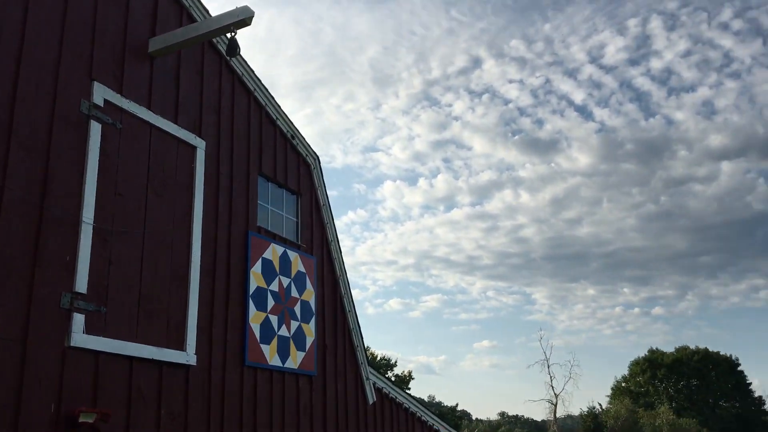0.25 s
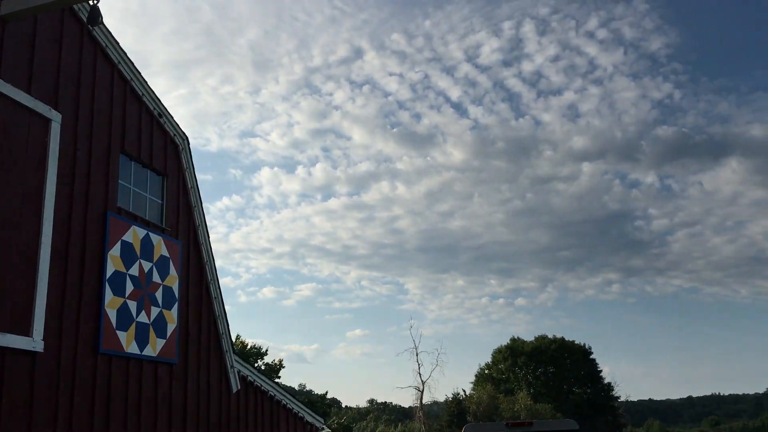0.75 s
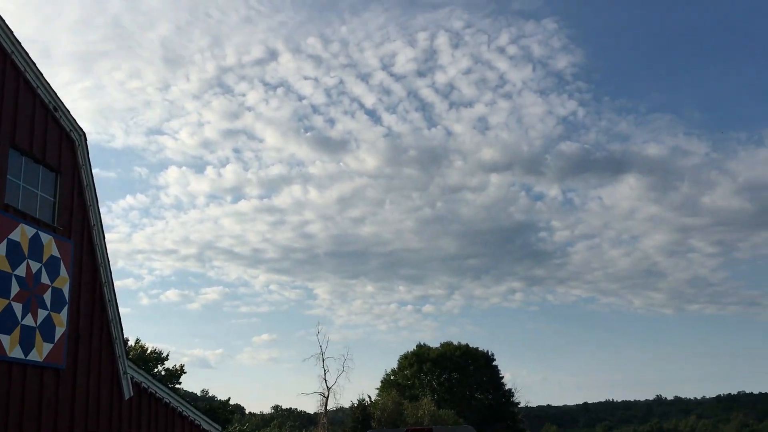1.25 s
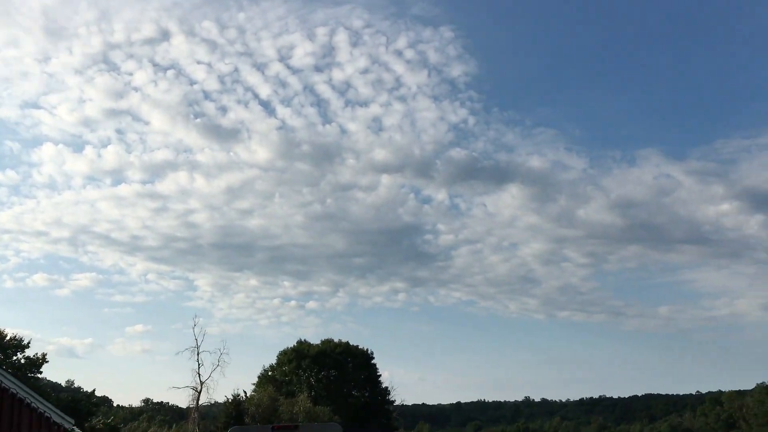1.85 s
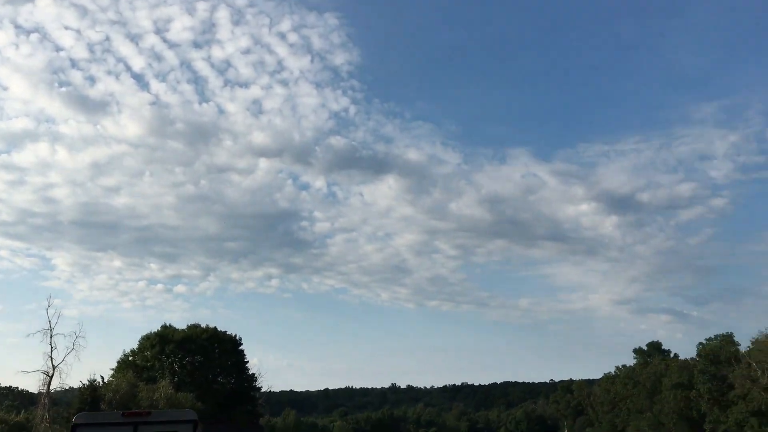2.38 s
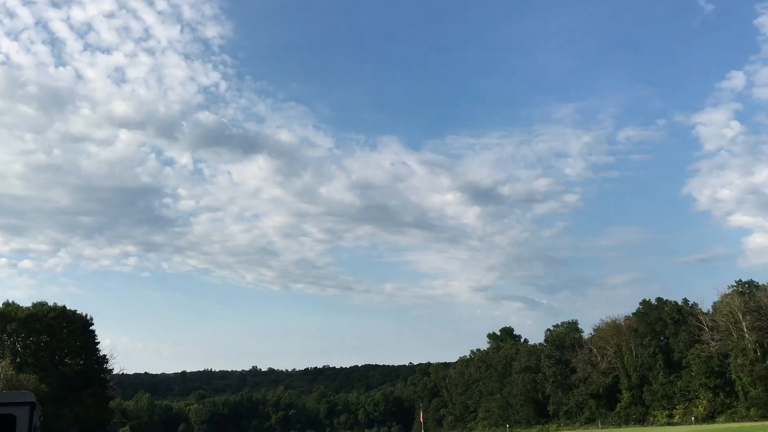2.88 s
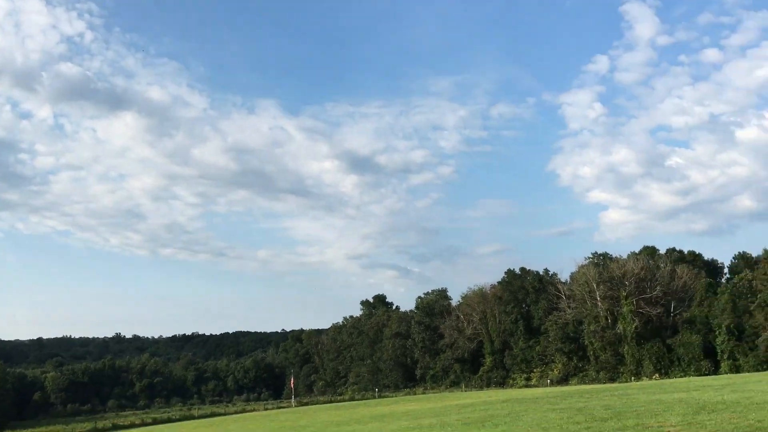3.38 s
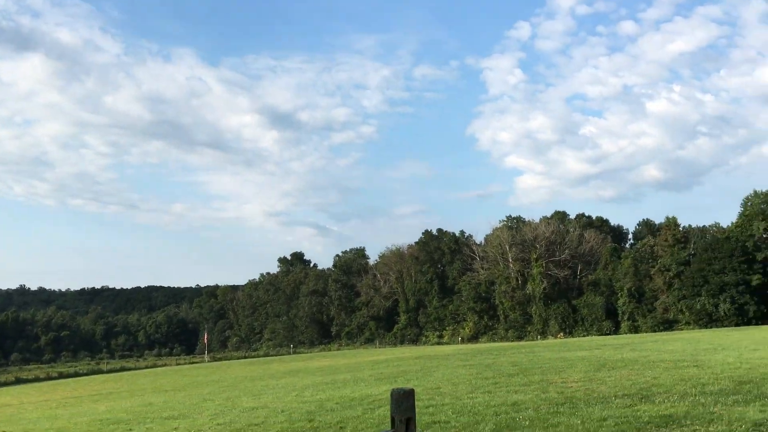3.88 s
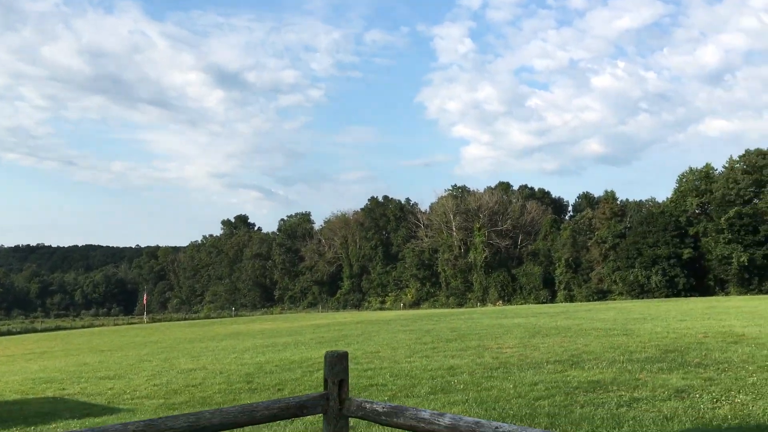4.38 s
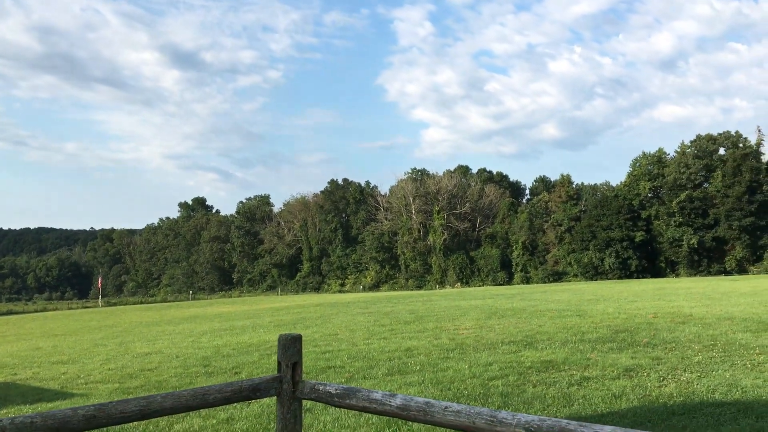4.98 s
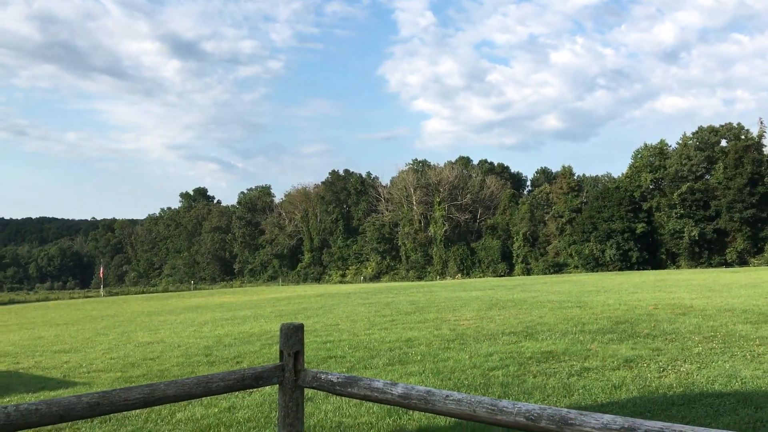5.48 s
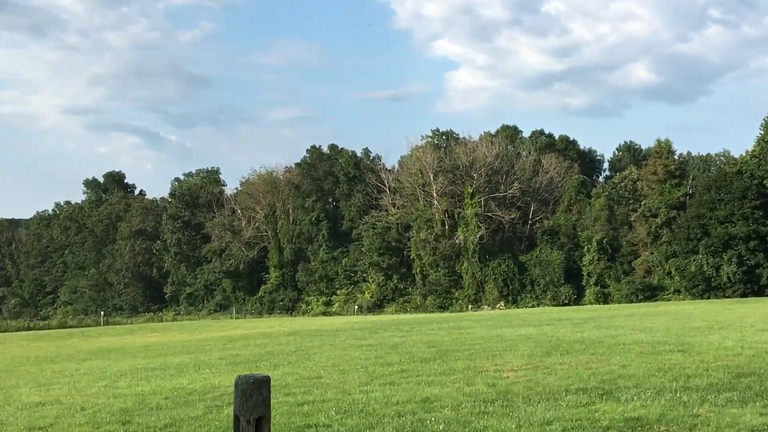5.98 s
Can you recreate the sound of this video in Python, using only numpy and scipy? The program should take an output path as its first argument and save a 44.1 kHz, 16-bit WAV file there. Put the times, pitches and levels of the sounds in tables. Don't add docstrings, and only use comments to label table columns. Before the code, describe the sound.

Steady low wind on a small mono microphone, with thin insect buzz and a barely audible far engine. Little birds whistle short arched notes and chip nearby while the camera body clicks as the hand shifts. Then a distant young hawk gives three spaced cries: the first hoarse and scooping upward, the next two leaping into a piercing high note, all dropping off quickly into a woodland echo.

```python
import sys
import numpy as np
from scipy import signal
from scipy.fft import rfft, irfft
from scipy.io import wavfile
from scipy.ndimage import uniform_filter1d, map_coordinates

SR = 44100
rng = np.random.default_rng(int(sys.argv[2]) if len(sys.argv) > 2 else 0)


def gain_from_db(level_db):
    decades = np.asarray(level_db, float) / 20
    return 10 ** decades


def store_pcm(level_fs):
    pcm = np.round(np.clip(level_fs, -1, 1) * 32767).astype(np.int16)
    wavfile.write(sys.argv[1], SR, np.atleast_2d(pcm).T)


N = 275095

# frequency_hz, density_db
WIND_SPECTRUM = [(12, -69), (20, -41), (24, -37.5), (36, -7.5), (65, 3), (97, 0), (129, -6.5), (193, -15),
                 (216, -32), (344, -23), (400, -27.5), (520, -63.5), (880, -120)]
# time_s, level_db
WIND_GUSTS = [(0, -43.5), (.96, -43.5), (1.2, -43), (1.77, -42.5), (2.08, -44), (2.71, -42.5), (3.14, -46),
              (3.42, -42), (3.75, -44.5), (4.59, -42.5), (5.42, -42.5), (5.63, -45.5), (5.91, -44),
              (6.24, -41)]
# frequency_hz, density_db
LEAF_SPECTRUM = [(120, -12.5), (200, 2), (232, -3), (340, -7), (453, -11), (860, -10.5), (1210, -16),
                 (2970, -22.5), (3500, -23), (4790, -25.5), (5200, -24), (6760, -64), (11400, -120)]
# time_s, gain_db
RUSTLES = [
    (2.08, 1.5),
    (2.92, 3),
    (5.63, 2),
]
# time_s, share_0_to_1
FACING_TREES = [(0, 0.82), (.2, 0), (1.8, 0), (3.4, 0.89), (6.24, 0.51)]
# frequency_hz, density_db
HISS_SPECTRUM = [(4590, -55.5), (7800, -7), (8490, -6), (10500, -12), (11400, -10), (14300, -11.5),
                 (15700, -15)]
# time_s, firing_hz, level_db
ENGINE = [(0, 84, -70), (2.5, 85.64, -88), (3.3, 84.6, -45), (4.2, 84.52, -45.5), (4.7, 84.94, -43.5),
          (5.1, 84.59, -63), (5.6, 83.96, -47), (6.24, 84.55, -58.5)]
# frequency_hz, density_db
CHORUS_SPECTRUM = [(2760, -46), (4700, -22), (5040, -20), (5360, 3), (5610, 3), (6080, 0), (6680, 4.5),
                   (7170, 5), (7640, -0.5), (7970, -6), (8600, -36), (11200, -23.5), (18900, -120)]
# time_s, level_db
CRICKET_LEVEL = [(0, -71.5), (1.8, -69), (2.7, -74), (3.4, -76.5), (4.3, -73.5), (5.2, -70), (6.24, -69.5)]
# time_s, chirps_per_s
CHIRP_RATE = [(0, 14.9), (2.75, 14.9), (2.85, 15.15), (6.24, 15.15)]
# start_s, peak_db
KATYDID_BURSTS = [(0.0423, -63), (0.2389, -62), (.575, -68), (.79, -63), (.845, -63), (1.051, -64),
                  (1.4935, -58.5), (1.8188, -60), (3.034, -63), (4.249, -61), (4.605, -60), (5.0215, -62),
                  (5.4, -63), (5.7354, -63), (6.05, -61)]
# start_s, length_s, start_hz, end_hz, peak_db
FAR_TONES = [(0, .45, 2640, 2590, -65), (0, .22, 3520, 3400, -61), (.2, .15, 3280, 3190, -65),
             (.05, .2, 5610, 5550, -65), (.65, .17, 3500, 3400, -66), (.862, .04, 4200, 3400, -64),
             (.89, .08, 3250, 3080, -64), (2.612, .04, 3450, 3800, -62), (2.64, .06, 3780, 3800, -61),
             (2.695, .07, 3800, 3300, -64), (2.75, .2, 3500, 3350, -64), (2.58, .16, 2350, 2500, -63)]
# start_s, peak_db, ring_hz, rise_cycles
CAMERA_TICKS = [(.62, -50, 2010, 3.3), (0.6275, -38, 2350, 1.8), (.628, -48.5, 4650, 3),
                (0.7236, -40, 1500, .6), (.7238, -46, 2400, .8), (0.7272, -48, 450, 0.42),
                (2.131, -51, 4640, 4.3), (2.131, -46, 6300, 2), (2.5001, -36, 1750, 1.1),
                (2.5006, -39, 1200, .7), (2.5003, -42, 2500, 1.5), (2.5034, -43, 1350, 1),
                (2.5055, -47, 2000, 3), (2.5025, -38, 225, 0.36), (2.9533, -31, 950, 0.55),
                (2.9531, -37, 450, .5), (2.9533, -44, 2400, .8), (2.9533, -46, 4000, 1.2),
                (2.972, -43, 690, 0.31), (3.772, -46, 4400, 1.3), (3.773, -43, 9080, .7),
                (3.888, -45, 1340, 1.7), (5.546, -50, 4250, 5), (5.553, -44, 2200, .7),
                (5.556, -46, 3600, .6), (5.562, -52, 5200, 2), (5.39, -52, 2900, 1)]
# start_s, length_s, start_hz, end_hz, peak_db
GLIDES = [(1.222, .016, 4700, 3900, -51), (1.225, .009, 3550, 3250, -53), (1.229, .008, 4500, 4700, -56),
          (1.236, .014, 4000, 3750, -56), (1.255, .015, 4300, 3800, -61), (1.25, .016, 9000, 9600, -61),
          (1.17, .05, 3300, 4100, -67), (1.33, .04, 3250, 3100, -65), (1.37, .035, 3700, 4300, -67),
          (1.555, .025, 2900, 3900, -64), (1.975, .02, 2460, 2400, -61), (2.368, .026, 2040, 2180, -53),
          (2.39, .01, 2200, 2750, -60), (2.398, .017, 2750, 1800, -60), (2.66, .016, 3700, 1400, -59),
          (2.685, .014, 3300, 1500, -62), (5.562, .013, 6200, 5800, -51)]
# start_s, length_s, start_hz, end_hz, peak_db
CHIP = [
    (1.232, .011, 3250, 3040, -46),
    (1.242, .01, 3170, 2930, -45),
    (1.25, .008, 3100, 2750, -54),
    (1.262, .012, 3200, 2950, -60),
]
# start_s, length_s, top_hz, peak_db
ARCHES = [
    (2.02, .025, 1880, -57),
    (2.135, .035, 1940, -54),
    (2.272, .035, 1960, -57),
    (2.535, .03, 2080, -57),
    (2.87, .07, 1950, -61),
    (5.545, .025, 1850, -60),
]
# start_s, length_s, top_hz, peak_db
DROOPS = [
    (3.085, .05, 1950, -59),
    (3.265, .045, 1930, -58),
    (3.31, .03, 1870, -62),
    (3.53, .04, 1820, -59),
    (3.79, .04, 1850, -60),
    (4.15, .045, 1900, -59),
]
# start_s, length_s, top_hz, peak_db
HOOPS = [
    (4.515, .05, 2050, -59),
    (4.805, .045, 1880, -57),
    (5.095, .045, 2000, -58),
    (5.125, .035, 2000, -61),
]
# start_s, length_s, start_hz, end_hz, peak_db
CHIRRUP = [(4.227, .011, 3000, 4600, -48), (4.236, .021, 4600, 6400, -54), (4.254, .014, 6400, 6000, -56),
           (4.235, .017, 3000, 4750, -42), (4.249, .009, 3400, 4400, -53), (4.252, .017, 4700, 4450, -48),
           (4.257, .008, 3700, 4500, -50), (4.263, .011, 4500, 2000, -44), (4.272, .007, 3000, 4300, -54),
           (4.273, .012, 4500, 4650, -53), (4.283, .012, 4600, 3000, -52), (4.295, .008, 4400, 3200, -54),
           (4.306, .008, 3700, 4600, -57)]
LOW_LINES = [(3, 0, 0, -15, 40), (1, 2, 1, -1, 170), (2, 2, 1, -10, 200), (3, 2, 1, -15, 70),
             (2, 0, 0, -8, 300), (1, 1, 2, -2, 250), (1, 1, 2, -4, 1300), (1, 3, 2, -10, 400),
             (1, 0, 2, 3, 250)]
HIGH_LINES = [(3, 0, 3, 0, 40), (1, 1, 1, 0, 70), (1, -1, 2, -1, 130), (1, -1, 2, -11, 600),
              (1, 2, 1, -15, 200), (2, -1, 1, -15, 80), (3, -1, 1, -11, 50)]
# time_s, level_db
FIRST_CRY = [(3.368, -52.5), (3.48, -44), (3.53, -48.5), (3.75, -38), (3.79, -49.5), (3.841, -30.5),
             (3.869, -56.5), (3.906, -27.5), (3.921, -49.5)]
# start_s, length_s, start_hz, end_hz
CLIMBS = [
    (4.465, 0.1, 2181, 2709),
    (5.384, .072, 2200, 2838),
]
# time_s, pitch_hz, level_db
HELD_NOTES = [
    [(4.566, 3095, -40), (4.6, 3136, -37.5), (4.7, 3154, -38), (4.79, 3289, -35.5), (4.83, 3281, -40),
     (4.858, 3245, -35.5), (4.876, 3160, -46)],
    [(5.457, 3203, -38), (5.51, 3236, -34.5), (5.59, 3221, -36), (5.67, 3302, -34.5), (5.699, 3350, -37),
     (5.708, 3381, -33.5), (5.757, 3415, -36), (5.774, 3370, -47), (5.797, 3260, -35)],
]
# start_s, length_s, start_hz, start_db, octave_db
DROPS = [
    (3.922, .053, 2640, -48, -56),
    (4.875, .042, 2720, -55, -66),
    (5.797, .04, 2780, -54, -66),
]
# frequency_hz, t60_s
TREE_DECAY = [(1500, 1.55), (2600, 1.325), (3300, 1.375), (5200, 1.83), (10000, 0.29)]


def unit(x):
    return x / np.sqrt(np.mean(x ** 2) + 1e-20)


def along(points, hz):
    f, v = np.transpose(points)
    return np.interp(np.log(hz + 1), np.log(f + 1), v)


def curves(rows):
    s, *columns = np.transpose(rows)
    return [np.interp(np.arange(N) / SR, s, column) for column in columns]


def gate(start, end, edge):
    t = np.arange(N) / SR
    return np.clip(np.minimum(t - start, end - t) / edge + .5, 0, 1)


def arc(u, values):
    return np.interp(u, [0, .5, 1], values)


def wobble(rate, count=N):
    knots = rng.standard_normal(int(count * rate / SR) + 4)
    return map_coordinates(knots, [np.arange(count) * rate / SR])


def turns(hz):
    return 2 * np.pi * np.cumsum(hz) / SR


def rush(spectrum, patchy_db):
    z = signal.stft(rng.standard_normal(N + 512), nperseg=512)[2]
    patches = uniform_filter1d(rng.standard_normal(z.shape), size=6, axis=0)
    patches = uniform_filter1d(patches, size=12, axis=1)
    x = signal.istft(z * gain_from_db(patchy_db * unit(patches)), nperseg=512)[1]
    colour = gain_from_db(along(spectrum, np.fft.rfftfreq(len(x), 1 / SR)))
    return unit(irfft(rfft(x) * colour, len(x))[:N])


def wind():
    gust_db, = curves(WIND_GUSTS)
    return gain_from_db(gust_db + 1.0 + 1.444 * wobble(6.2)) * rush(WIND_SPECTRUM, patchy_db=0.5)


def leaves_and_hiss():
    facing, = curves(FACING_TREES)
    t, stir_s = np.arange(N) / SR, 0.096
    stir_db = sum(db * np.exp(-((t - s) / stir_s) ** 2) for s, db in RUSTLES)
    leaves_db = -60 + 1.5 * facing + stir_db
    hiss_db = -72 + 0.58 * stir_db
    leaves = gain_from_db(leaves_db + 3.5) * rush(LEAF_SPECTRUM, patchy_db=1.13)
    return leaves + gain_from_db(hiss_db + 3.5) * rush(HISS_SPECTRUM, patchy_db=.7)


def engine():
    firing_hz, level_db = curves(ENGINE)
    phase = turns(firing_hz + 0.696 * wobble(6))
    tone = np.sin(phase) + gain_from_db(-12.5) * np.sin(2 * phase)
    return gain_from_db(level_db + 3.5 + 2.33 * wobble(5.29)) * tone


def chorus():
    facing, = curves(FACING_TREES)
    return gain_from_db(-62.5 + 2 * facing) * rush(CHORUS_SPECTRUM, patchy_db=0.22)


def cricket():
    level_db, = curves(CRICKET_LEVEL)
    swell = np.clip(np.cos(turns(*curves(CHIRP_RATE)) - 2.7) - .4, 0, 1)
    return gain_from_db(level_db) * unit(swell * np.sin(turns(7330 + 110 * wobble(220))))


def katydid():
    strokes = np.clip(np.cos(turns(90 + 3 * wobble(3.7))), 0, 1)
    buzz = strokes * np.sin(turns(8550 + 35 * wobble(260)))
    bursts = sum(gain_from_db(db - 1) * gate(s, s + 0.0585, edge=.015) for s, db in KATYDID_BURSTS)
    return bursts * buzz


def whistles(rows, overtones_db, blur_hz, shimmer_db):
    out = np.zeros(N + SR)
    blur = blur_hz * wobble(90)
    shimmer = gain_from_db(shimmer_db * wobble(60.79))
    for s, length, *hz, db in rows:
        at, u = round(s * SR), np.linspace(0, 1, round(length * SR))
        span = slice(at, at + len(u))
        glide_hz = np.polyval(np.polyfit([0, .5, 1], hz, 2), u)
        phase = turns(glide_hz + blur[span])
        tone = np.sin(phase)
        for harmonic, overtone_db in enumerate(overtones_db, start=2):
            tone = tone + gain_from_db(overtone_db) * np.sin(harmonic * phase)
        out[span] += gain_from_db(db) * np.sin(np.pi * u) ** .7 * tone * shimmer[span]
    return out[:N]


def bowed(rows):
    return [(s, length, a, (a + b) / 2 + .12 * abs(b - a), b, db) for s, length, a, b, db in rows]


def far_tones():
    return whistles(bowed(FAR_TONES), [], blur_hz=55, shimmer_db=2) * (.75 + .45 * wobble(400))


def camera_ticks():
    out, t = np.zeros(N + SR), np.arange(SR // 20) / SR
    for s, db, hz, cycles in CAMERA_TICKS:
        u = t * hz / cycles
        out[round(s * SR):][:len(t)] += gain_from_db(db) * u * np.exp(1 - u) * np.sin(2 * np.pi * hz * t)
    return out[:N]


def arched(rows, start, end):
    return [(s, length, start * hz, hz, end * hz, db) for s, length, hz, db in rows]


def small_birds():
    notes = arched(ARCHES, .93, .94) + arched(DROOPS, .95, .82) + arched(HOOPS, .8, .78)
    songs = whistles(notes + bowed(GLIDES), [-25], blur_hz=25, shimmer_db=1.5)
    chirrup = whistles(bowed(CHIRRUP), [], blur_hz=30, shimmer_db=1.5)
    chip = whistles(bowed(CHIP), [-1, -10], blur_hz=60, shimmer_db=2.5)
    return songs + chirrup + chip


def syrinx(pitch, flutter, level_db, controls_db, lines, tremble_db):
    n = len(pitch)
    fast = turns(uniform_filter1d(pitch, size=600) + 4 * wobble(69.52, n))
    slow = turns(flutter)
    voice = gain_from_db(level_db + tremble_db * wobble(69.3, n)) * np.sin(fast)
    voice += gain_from_db(controls_db[0] + 2.26 * wobble(48.5, n)) * np.sin(2 * fast)
    for k, m, control, db, smear_hz in lines:
        steady = np.sqrt(30 / smear_hz)
        smear = steady + .65 * (wobble(smear_hz, n) + 1j * wobble(smear_hz, n))
        line = np.real(smear * np.exp(1j * (k * fast + m * slow)))
        voice += gain_from_db(controls_db[control] + db) * line
    return np.sqrt(2) * voice * signal.windows.tukey(n, 0.0038 * SR / n)


def note_span(start, end):
    return slice(round((start - .004) * SR), round((end + .004) * SR))


def low_note(s, length, shape):
    span = note_span(s, s + length)
    t = np.clip(np.arange(span.start, span.stop) / SR - s, 0, length)
    pitch, level_db, octave_db, side_db, extra_db = shape(t)
    rasp_db = side_db + extra_db + np.clip(-.7 * (level_db + 33.0), -3, 7)
    controls_db = [octave_db, side_db, rasp_db]
    out = np.zeros(N)
    out[span] = syrinx(pitch, pitch / 4, level_db - 1.5, controls_db, LOW_LINES, tremble_db=3.5)
    return out


def first_cry(t):
    s, db = np.transpose(FIRST_CRY)
    level_db = np.interp(t + s[0], s, db)
    bloom_db = -8 * np.clip(1 - t / 0.024, 0, 1)
    pitch = 2586.4 + 73 * t - 628.4 * np.exp(-t / 0.079)
    side_db = -61 + bloom_db + 0.14 * (level_db - db.mean())
    return pitch, level_db, -57.5 + bloom_db, side_db, -8 * t


def climb(u, start_hz, end_hz):
    pitch = start_hz + (end_hz - start_hz) * u ** .7
    return pitch, -64 + 26 * u, arc(u, (-74, -57, -62)), arc(u, (-71, -60, -61)), -4


def high_note(rows):
    span = note_span(rows[0][0], rows[-1][0])
    pitch, level_db = (c[span] for c in curves(rows))
    t = np.arange(len(pitch)) / SR
    full_strain_hz = 148
    strain = np.clip((pitch - pitch[0]) / full_strain_hz, 0, 1) ** 0.65
    letting_go = np.clip(1 - t[::-1] / .045, 0, 1)
    octave_db = -61 + 2.5 * strain + 6 * letting_go
    upper_db = -79 + 22.5 * strain
    lower_db = np.maximum(-63 + 13 * strain, -42 - 380 * t)
    third_db = -69 - 4 * strain
    lower_hz = 2680 + .6 * (pitch - 3140)
    controls_db = [octave_db, upper_db, lower_db, third_db]
    out = np.zeros(N)
    out[span] = syrinx(pitch, pitch - lower_hz, level_db, controls_db, HIGH_LINES, tremble_db=1.5)
    return out


def drop(u, start_hz, start_db, octave_db):
    pitch = start_hz + (1950 - start_hz) * u ** 1.9
    level_db = start_db + (-62 - start_db) * u
    side_db = octave_db + 52.5 + arc(u, (-57, -54, -70))
    return pitch, level_db, octave_db + arc(u, (0, -5, -26)), side_db, -4


def hawk():
    start, end = FIRST_CRY[0][0], FIRST_CRY[-1][0]
    cry = low_note(start, end - start, first_cry)
    for s, length, a, b in CLIMBS:
        cry += low_note(s, length, lambda t: climb(t / length, a, b))
    for rows in HELD_NOTES:
        cry += high_note(rows)
    for s, length, a, db, octave_db in DROPS:
        cry += low_note(s, length, lambda t: drop(t / length, a, db, octave_db))
    return cry


def trees(x, gap, reach):
    hz, t, z = signal.stft(rng.standard_normal(2 * SR), SR, nperseg=256)
    decay_db = -60 * t / (reach * along(TREE_DECAY, hz)[:, None])
    tail = signal.istft(z * gain_from_db(decay_db), SR, nperseg=256)[1]
    delayed = np.pad(x, (round(gap * SR), 0))
    return signal.fftconvolve(delayed, tail / np.linalg.norm(tail))[:N]


def scene():
    field = wind() + leaves_and_hiss() + engine() + chorus() + cricket() + katydid()
    field += far_tones() + camera_ticks()
    small = small_birds()
    field += small + gain_from_db(-7) * trees(small, gap=.005, reach=.1) + gain_from_db(-12) * trees(small, gap=.015, reach=.35)
    cry = hawk()
    hedges = gain_from_db(-10) * trees(cry, gap=0.0055, reach=.15)
    moving_air = 1 + .15 * wobble(90)
    tree_line = gain_from_db(-16) * moving_air * trees(cry, gap=.03, reach=1.02)
    return (field + cry + hedges + tree_line)[None]


def roll_off(x):
    return signal.sosfilt(signal.butter(12, 15860, fs=SR, output="sos"), x)


def record(dry):
    return roll_off(dry)


dry = scene()
out = record(dry)
store_pcm(out)
```